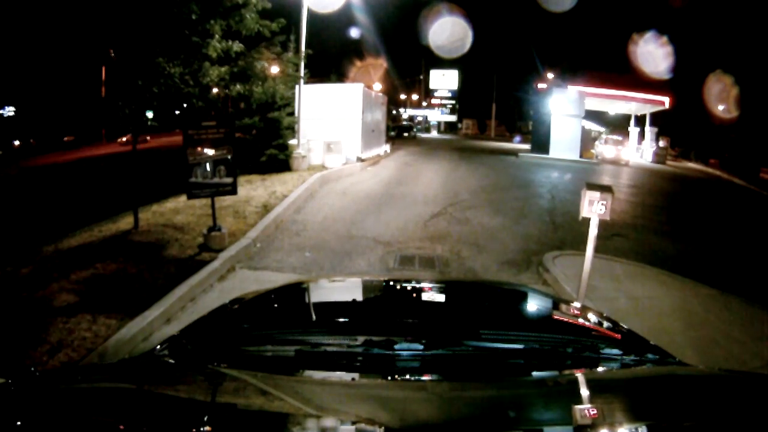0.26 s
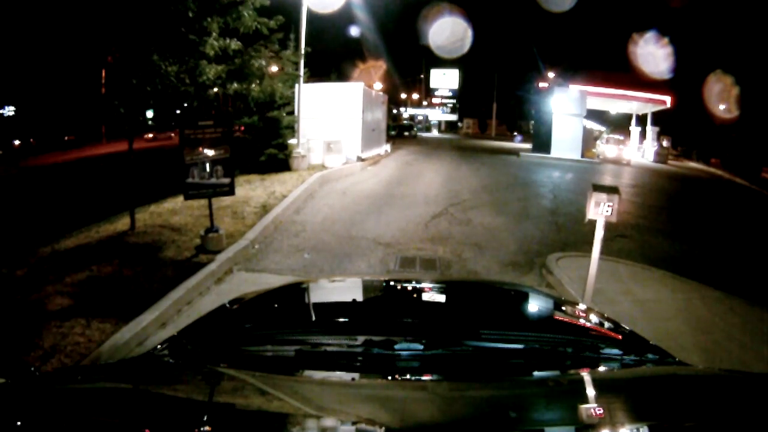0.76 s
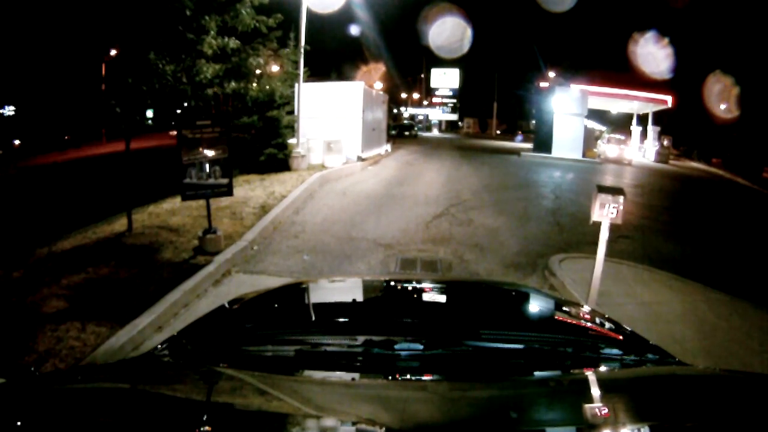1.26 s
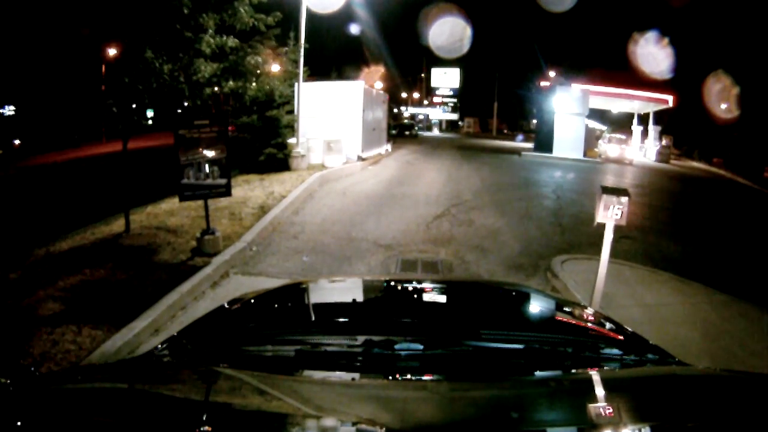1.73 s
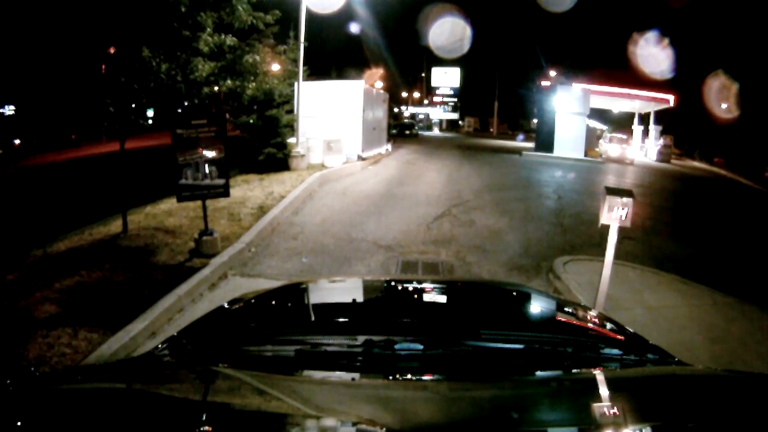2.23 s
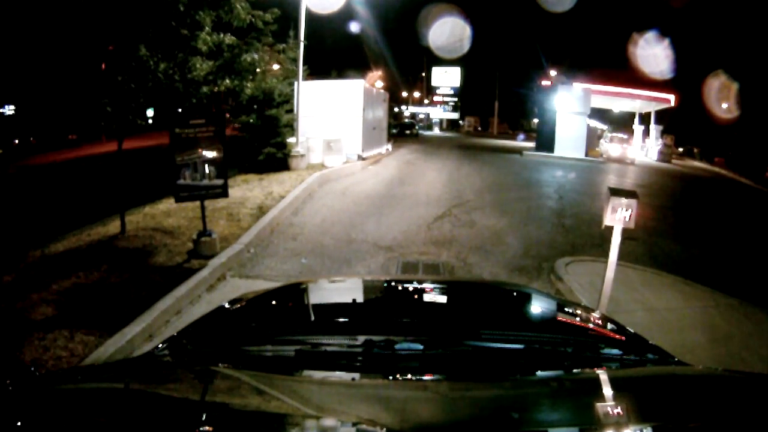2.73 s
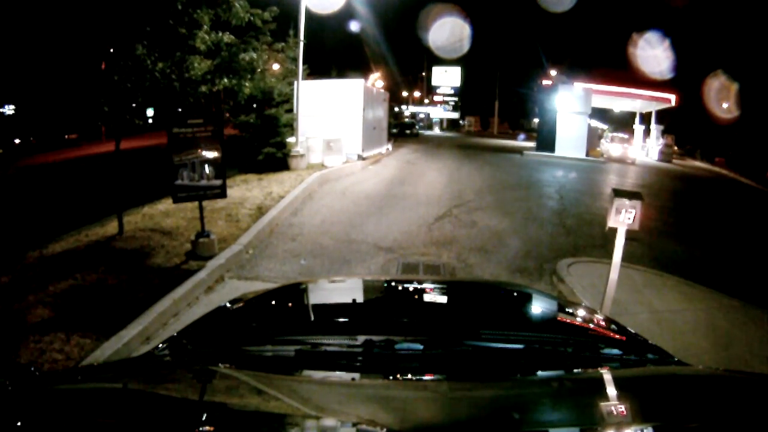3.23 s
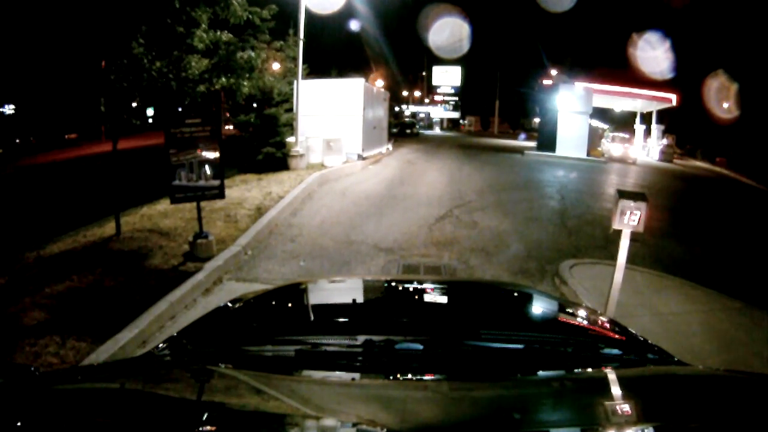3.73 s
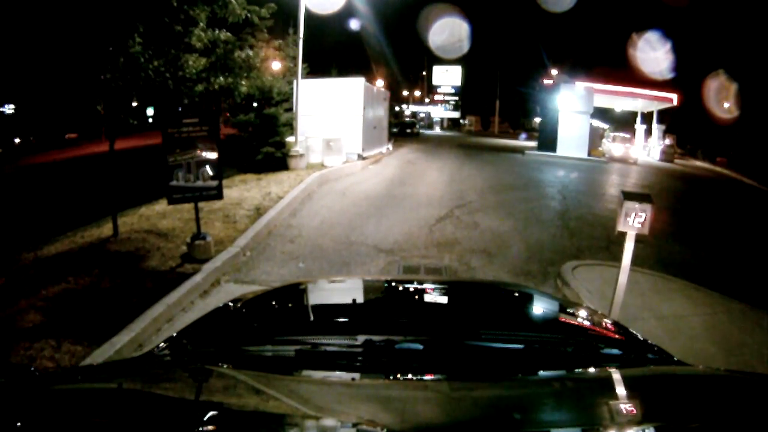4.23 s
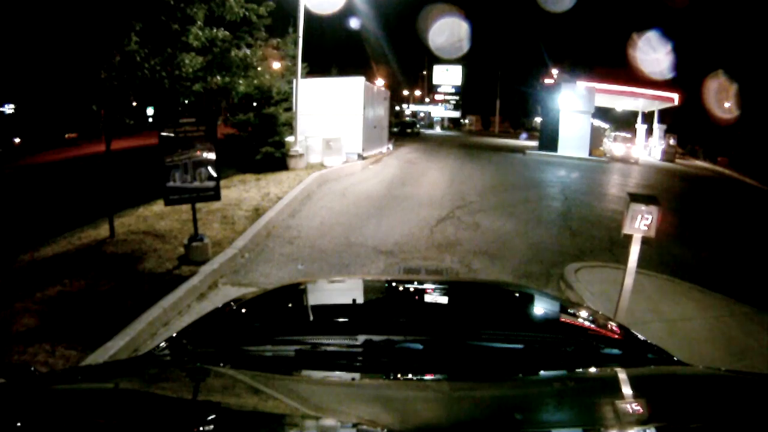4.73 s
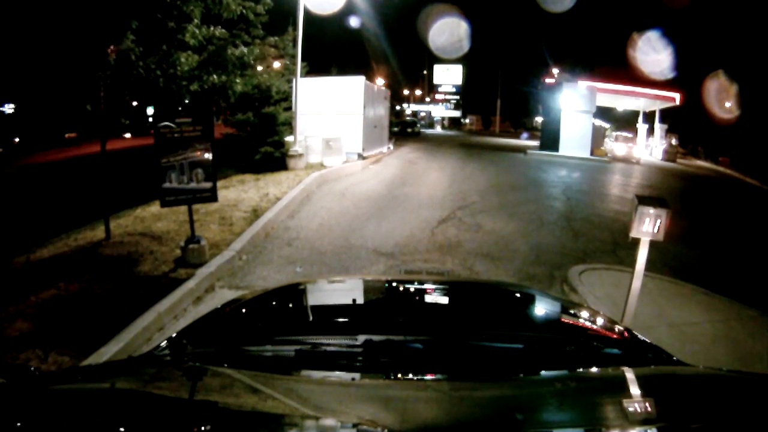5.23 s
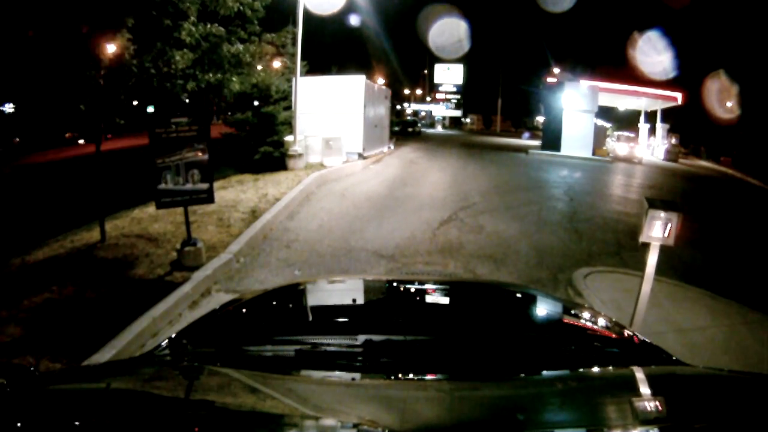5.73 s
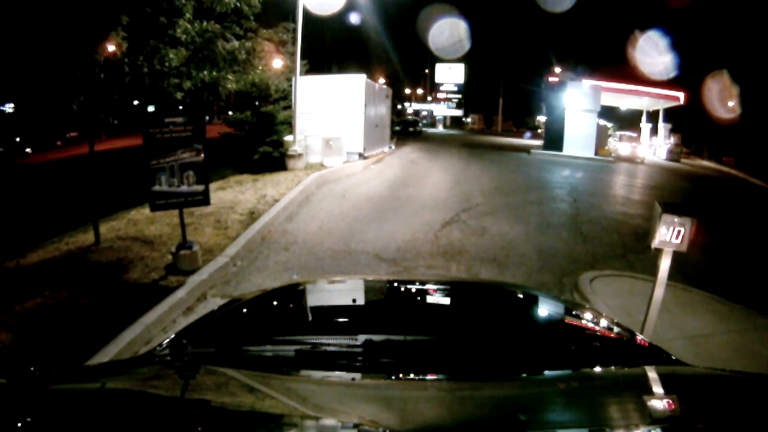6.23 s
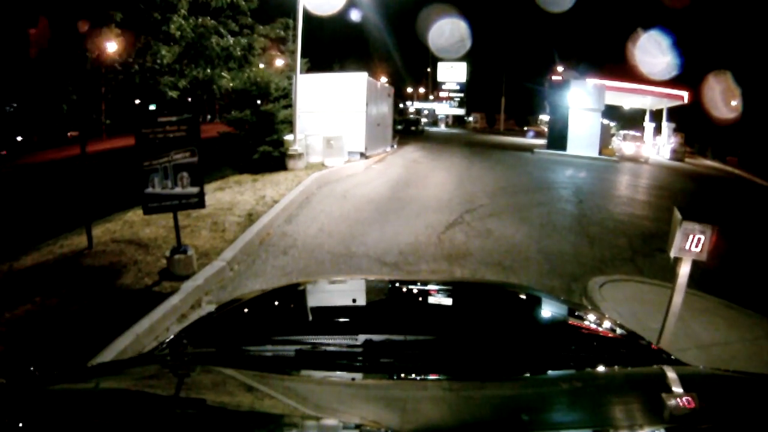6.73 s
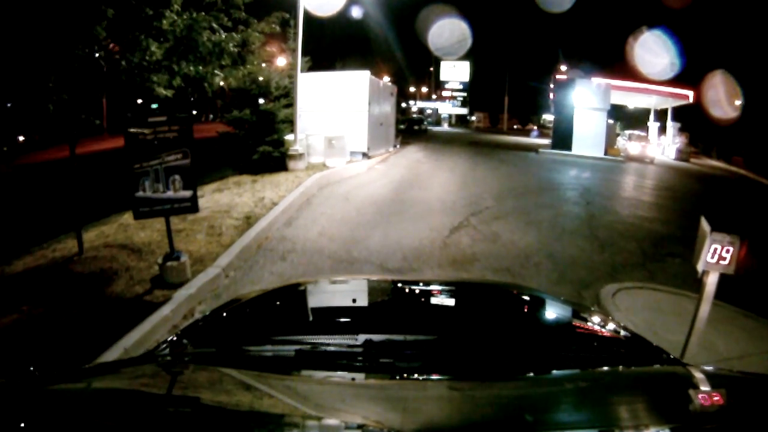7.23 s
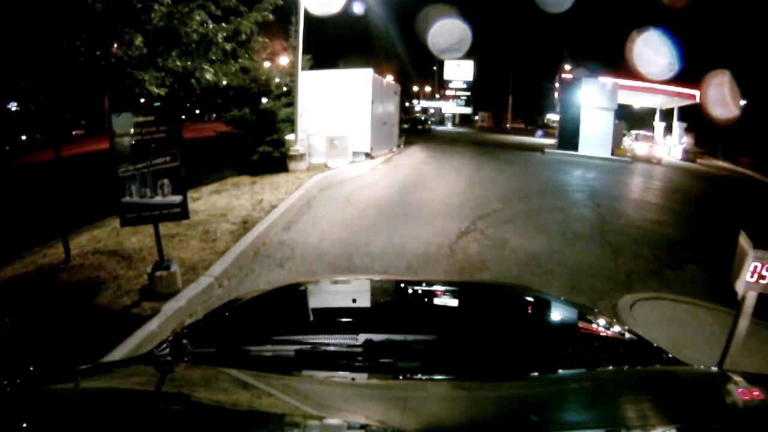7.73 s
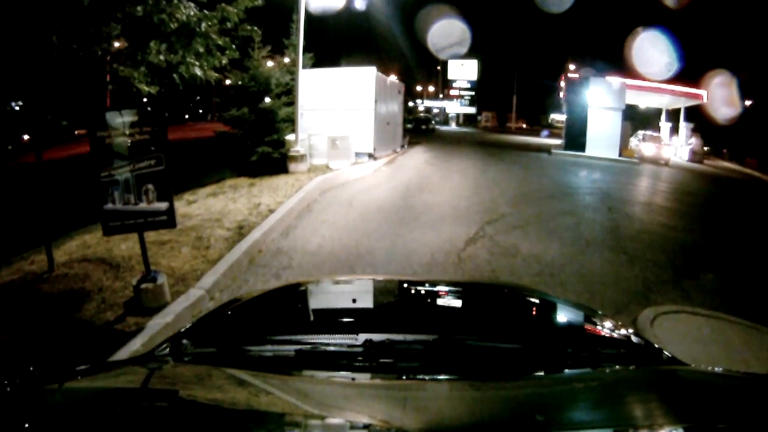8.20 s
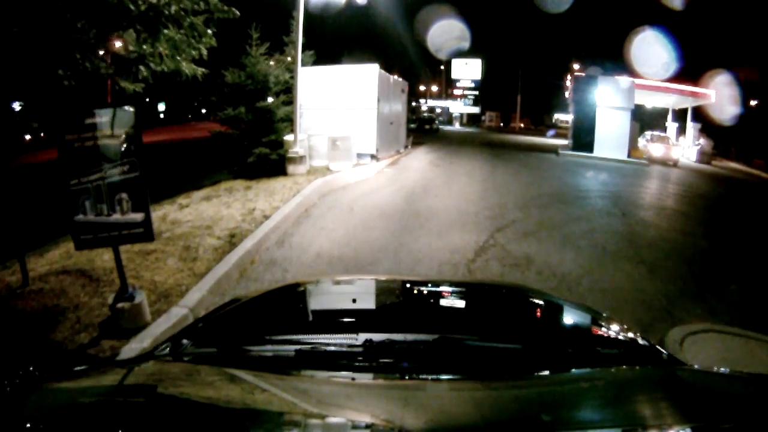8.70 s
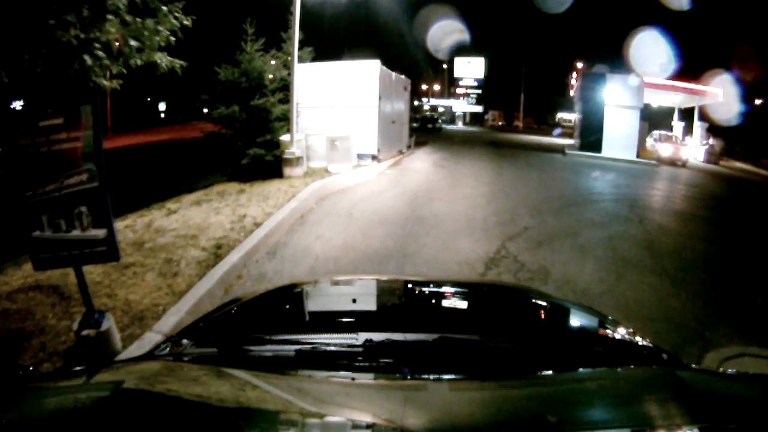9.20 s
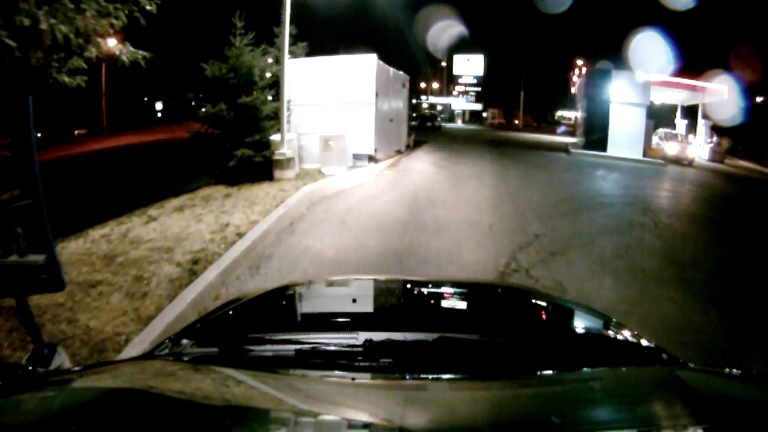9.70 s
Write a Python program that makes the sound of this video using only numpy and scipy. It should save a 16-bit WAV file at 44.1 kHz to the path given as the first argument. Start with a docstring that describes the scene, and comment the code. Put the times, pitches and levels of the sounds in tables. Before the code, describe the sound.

From the first instant, heard inside a car under car wash dryers, a loud dense roar fills the cabin: midrange-heavy blower noise, faint blurred fan hum and a broad fluttering hiss with gritty, lo-fi treble. At about 0.5 s a gust swells and flings a burst of fine droplets at the glass, trailing off by 1 s. Beneath, low roof drumming and deep cabin boom move in uneven lumps, with soft thumps near 1.9, 2.4 and 4.4 s and the boom heaviest around 3 s. Occasional tiny drop ticks come near 1.9, 5 and 6.1 s. From 4.5 to 6.3 s the drumming and spray weaken as the jet leaves the roof. After 7 s the roar and hiss recede steadily, dropping faster from 8.9 s, leaving a thinner rush with a faint low engine throb, rising slightly after 9.2 s, and subtle tyre rumble until about 10 s.

```python
"""Blowers roar and hum at once, heard from inside a car that creeps out of a car wash under the air dryers.
Their jet, made of filtered noise, hisses over the body, drums on the roof and flings drops at the glass.
The drumming fades as the jet slides off the roof, then the roar falls behind.
That leaves the idling engine, two throbbing low tones, and the soft rumble of the tyres."""
import sys
import numpy as np
from scipy import signal
from scipy.fft import rfft, irfft
from scipy.io import wavfile
from scipy.ndimage import uniform_filter1d

SR = 44100
rng = np.random.default_rng(int(sys.argv[2]) if len(sys.argv) > 2 else 0)


def store_wav(level_fs):
    """Save 16-bit WAV to argv[1]."""
    pcm = np.round(np.clip(np.atleast_2d(level_fs), -1, 1) * 32767)
    wavfile.write(sys.argv[1], SR, pcm.T.astype(np.int16))


N = 439236
TIME = np.arange(N) / SR  # seconds
FREQ = np.maximum(np.arange(N // 2 + 1) * SR / N, 1)  # Hz, kept above 0 for the logarithms

# roar of the blower housings, shape of its spectrum: [f/Hz, level/dB]
ROAR_SPECTRUM = [(240, -15.5), (450, -18), (800, -19), (1100, -14.5), (1700, -18), (2100, 0.5), (2400, 4.5),
                 (2700, -3), (3200, -3.5), (4000, -8), (5000, -16.5), (6000, -46)]
# fan tones, level set against the common level of the tones: [f/Hz, half width/Hz, level/dB]
FAN_TONES = [(286.5, 3.7, -25.5), (458, 11, -26), (585, 7.4, -23.5), (1168, 5.4, -22)]
# hiss of the jet, shape of its smooth spectrum: [f/Hz, level/dB]
JET_SPECTRUM = [(220, -4.5), (400, -8), (650, -7.5), (1000, -5), (1600, -1), (2500, -3.5), (4000, -3),
                (5000, -8.5), (5600, -14), (6000, -18.5)]
# peaks and notches on the way through glass and cabin: [f/Hz, width/Hz, level/dB]
CABIN_PEAKS = [(526, 78, -2.5), (713, 67, -5.5), (780, 38, 3), (1119, 95, 5), (1710, 360, 5),
               (1920, 156, -8), (2109, 340, 8.5), (2310, 180, 3), (2640, 110, 1.3), (2802, 290, -3.5),
               (3167, 120, 3), (3674, 250, -3.5), (4420, 110, -3.5)]
# roof panel drummed by the jet, shape of its spectrum: [f/Hz, level/dB]
ROOF_SPECTRUM = [(70, -33), (98, -19), (112, -5.5), (124, -2), (139, -7.5), (155, -6.5), (166, 0),
                 (186, -4.5), (198, -29.5), (260, -21), (420, -36), (800, -60)]
# cabin air pumped by the jet, shape of its spectrum: [f/Hz, level/dB]
CABIN_AIR_SPECTRUM = [(17, -6), (25, -22), (42, -15), (51, 2.5), (58, -3), (63, -12), (72, -0.5), (90, -6),
                      (130, -18), (250, -57)]
# big eddies that thump the roof, level above the drumming: [t/s, level/dB]
THUMPS = [(1.9, 4), (2.37, 5.5), (4.43, 5.5)]
# the jet catches an edge and flings water at the glass: [t/s, strength 0-1, rise/s, fall/s]
GUSTS = [(.485, 1, .08, 0.11), (.625, 0.54, .03, 0.27)]
# single fat drops, level before the common drop level is added: [t/s, level/dB]
DROPS = [(.612, -21), (1.865, -23), (5.022, -22), (5.077, -23), (6.136, -27)]
# the car creeps off, gathering speed: [t/s, distance from the nozzles/m]
DISTANCE = [(0, 2.04), (2, 2.27), (4.3, 2.53), (7, 3.45), (8.8, 5.66), (9.96, 7.8)]

# outside the bay its wall shades the dryers more and more
EXIT_S, SHADE_DB_PER_S = 8.86, 7
# the jet slides off the end of the roof between these times
ROOF_END_S, ROOF_CLEAR_S = 4.45, 6.3
# the cabin heaves most as the jet passes overhead
OVERHEAD_S, OVERHEAD_RISE_S, OVERHEAD_FALL_S = 2.9, 2.4, .9
# the engine idles, then takes throttle as the car pulls away
ENGINE_HZ, IDLE_DB, THROTTLE_S, THROTTLE_DB_PER_S = 30.7, -53, 9.2, 5.5


def undb(db):
    """Decibels to gain."""
    return 10 ** (np.asarray(db) / 20)


def unit(x):
    """Scale to rms 1."""
    return x / np.sqrt(np.mean(x ** 2))


def slope(points):
    """A spectrum in dB through (Hz, dB) points, falling 12 dB per octave below the first."""
    hz, db = np.transpose(points)
    joined = np.interp(np.log(FREQ), np.log(hz), db)
    return joined + 40 * np.log10(np.minimum(FREQ / hz[0], 1))


def bell(hz, width):
    """A smooth bump of height 1 on the frequency axis."""
    return np.exp(-(2 * (FREQ - hz) / width) ** 2)


def colour(x, gain):
    """Filter by a gain per frequency; the result has rms 1."""
    return unit(irfft(rfft(x) * gain, N))


def noise(gain):
    """Turbulence with the given spectrum, rms 1."""
    return colour(rng.standard_normal(N), gain)


def walk(rate):
    """Slow random drift of spread 1 that changes about rate times a second."""
    return noise(np.exp(-(FREQ / rate) ** 2))


def after(start):
    """Seconds gone by since a moment, 0 before it."""
    return np.maximum(TIME - start, 0)


def swell(at, rise, fall):
    """A smooth rise to 1 and fall back in time."""
    return np.exp(-((TIME - at) / np.where(TIME < at, rise, fall)) ** 2)


def gust():
    """Strength of the gusts, about 0-1."""
    return sum(size * swell(s, rise, fall) for s, size, rise, fall in GUSTS)


def distance():
    """Metres from the nozzles, joined by straight lines in time."""
    seconds, metres = np.transpose(DISTANCE)
    return np.interp(TIME, seconds, metres)


def receding(spread, shade=1):
    """Change in dB as the car leaves.

    Spread is less for sound that fills the bay, shade is less for bass that bends round its wall.
    """
    metres = distance()
    return -20 * spread * np.log10(metres / metres[0]) - shade * SHADE_DB_PER_S * after(EXIT_S)


def off_roof():
    """How far the jet has slid off the roof, 0-1."""
    return np.clip(after(ROOF_END_S) / (ROOF_CLEAR_S - ROOF_END_S), 0, 1)


def cabin(echo_db=-19, echo_s=.035):
    """Gain of the path from outside to the seat; echoes off the bay walls add a fine ripple."""
    echoes = rng.standard_normal(N) * np.exp(-TIME / echo_s)
    echo_spectrum = rfft(echoes) / np.sqrt(np.sum(echoes ** 2))
    ripple = np.abs(1 + undb(echo_db) * echo_spectrum)
    peaks_db = sum(db * bell(hz, width) for hz, width, db in CABIN_PEAKS)
    return ripple * undb(peaks_db)


def blowers(path, roar_db=-26.5, spread=0.46, gust_db=1.2, surge_db=0.38, surge_hz=8,
            tones_db=-26.7, tones_spread=0.74):
    """The housings roar and the blades sing tones that the turbulent intake smears."""
    roar = noise(undb(slope(ROAR_SPECTRUM)) * path)
    roar_level = roar_db + receding(spread) + gust_db * gust() + surge_db * walk(surge_hz)
    # each tone is a narrow band of noise
    tones = sum(undb(db) * noise(1 / (1 + ((FREQ - hz) / width) ** 2)) for hz, width, db in FAN_TONES)
    tones_level = tones_db + receding(tones_spread)
    return roar * undb(roar_level) + tones * undb(tones_level)


def jet(path, hiss_db=-25.5, spread=1.0, gust_db=3.0, flutter_db=0.4, flutter_hz=45, hollow_db=-5):
    """Air tears over the body, fluttering, with a hollow in its upper middle."""
    spectrum = slope(JET_SPECTRUM) + hollow_db * bell(2290, 550)
    hiss = noise(undb(spectrum) * path)
    level = hiss_db + receding(spread) + gust_db * gust() + flutter_db * walk(flutter_hz)
    return hiss * undb(level)


def buffeting(roof_db=-29.5, roof_drop_db=11.0, spread=.3, boom_db=-41.5, boom_drop_db=12,
              overhead_db=4.0, evenness=0.27, lumps_db=1.1, lumps_hz=5, thump_s=.07):
    """Eddies drum on the roof and pump the cabin air, in lumps, weaker once the jet leaves the roof."""
    roof = noise(undb(slope(ROOF_SPECTRUM)))
    # the steady jet keeps feeding the panel, so its ups and downs are partly evened out
    ringing = np.sqrt(uniform_filter1d(roof ** 2, SR // 10))
    drum = unit(roof / ringing ** evenness)
    lumps = lumps_db * walk(lumps_hz)
    thumps = sum(db * swell(s, thump_s, thump_s) for s, db in THUMPS)
    drum_level = roof_db - roof_drop_db * off_roof() + receding(spread, shade=0) + lumps + thumps
    heave = overhead_db * swell(OVERHEAD_S, OVERHEAD_RISE_S, OVERHEAD_FALL_S)
    boom_level = boom_db + heave - boom_drop_db * off_roof()
    boom = noise(undb(slope(CABIN_AIR_SPECTRUM)))
    return drum * undb(drum_level) + boom * undb(boom_level)


def spray(path, per_second=1500, tick_s=.0007, drop_db=-6, mist_db=-44, dry_db=16, flung_db=-31):
    """Fine droplets patter on the glass, most in the gusts, with a few fat ones among them."""
    glass = path * undb(slope([(1200, -6), (4000, 7), (6000, -10)]))  # f/Hz, level/dB
    # clicks of random size at random moments
    hits = (rng.random(N) < per_second / SR) * rng.uniform(-1.3, 1, N)
    # the mist thins by dry_db as the jet leaves the roof
    amount = undb(mist_db - dry_db * off_roof()) + undb(flung_db) * gust()
    patter = colour(hits, glass) * amount
    # each fat drop starts sharply and dies within a few ticks
    splats = sum(undb(db + drop_db) * (TIME >= s) * np.exp(-np.abs(TIME - s) / tick_s) for s, db in DROPS)
    return patter + splats * noise(glass)


def engine(wander=0.0074, second_db=-9):
    """The idling engine's firing rate throbs through the floor, with a weaker tone at twice the rate."""
    phase = 2 * np.pi * np.cumsum(ENGINE_HZ * (1 + wander * walk(1))) / SR
    throb = unit(np.sin(phase) + undb(second_db) * np.sin(2 * phase))
    level = IDLE_DB + THROTTLE_DB_PER_S * after(THROTTLE_S) + walk(2)
    return throb * undb(level)


def tyres(roll_db=-58, tread_hz=330, width_hz=280):
    """The tyres rumble on the concrete, louder with speed; roll_db is the level at top speed."""
    speed = uniform_filter1d(np.gradient(distance(), TIME), SR)  # smoothed over one second
    rumble = noise(bell(tread_hz, width_hz)) * undb(roll_db)
    return rumble * np.sqrt(np.abs(speed) / speed.max())


def scene():
    """Everything as it reaches the seat."""
    path = cabin()
    outside = blowers(path) + jet(path)
    return (outside + buffeting() + spray(path) + engine() + tyres())[None]


def record(dry, top_hz=15200):
    """Sampling at 12 kHz and holding each sample mirrors the hiss into a gritty treble, cut at top_hz."""
    slow = signal.resample_poly(dry, 40, 147, axis=1)  # 44.1 to 12 kHz
    steps = np.repeat(slow, 4, axis=1)  # held at 48 kHz
    held = signal.resample_poly(steps, 147, 160, axis=1)[:, :N]  # back to 44.1 kHz
    low_pass = signal.ellip(14, .2, 70, top_hz, fs=SR, output="sos")
    return signal.sosfilt(low_pass, held)


dry = scene()
out = record(dry)
store_wav(out)
```